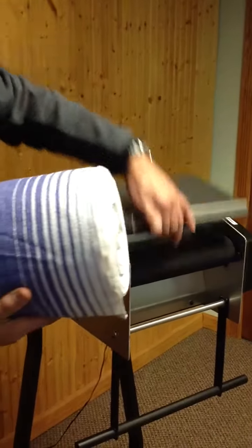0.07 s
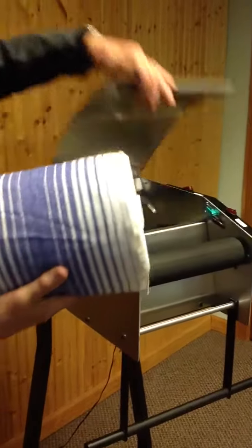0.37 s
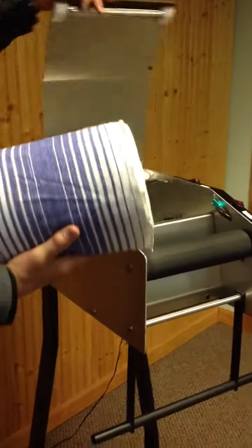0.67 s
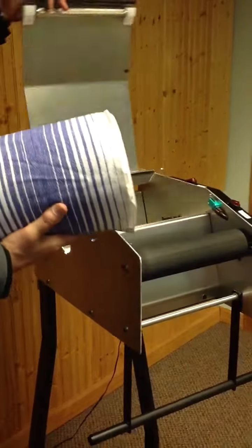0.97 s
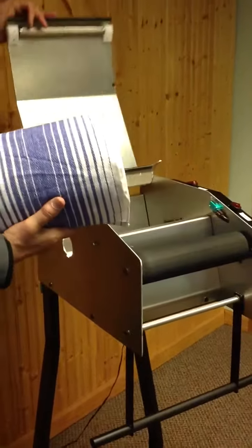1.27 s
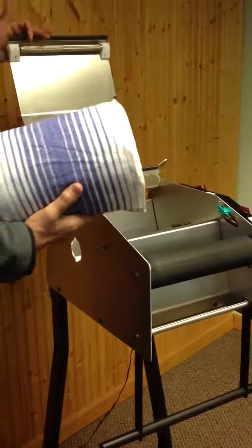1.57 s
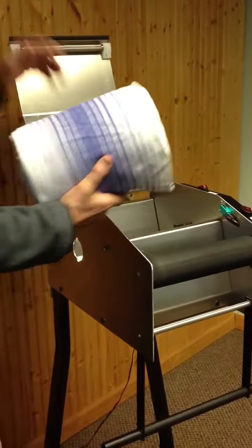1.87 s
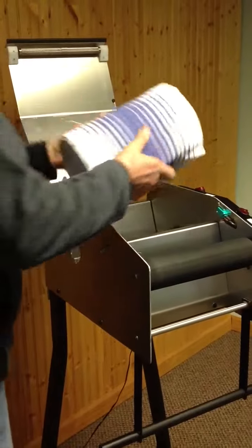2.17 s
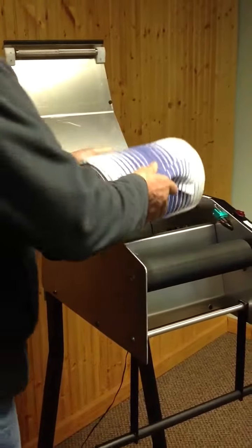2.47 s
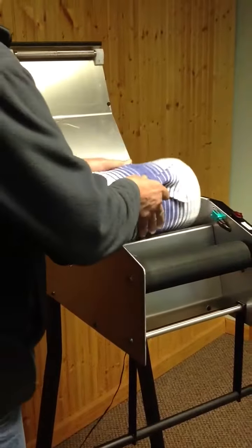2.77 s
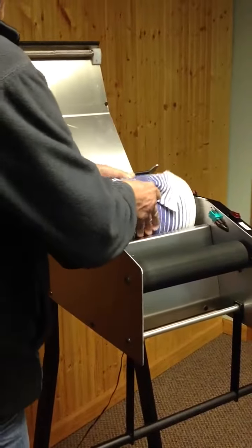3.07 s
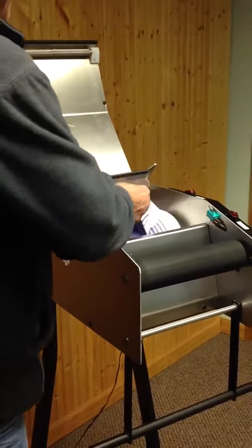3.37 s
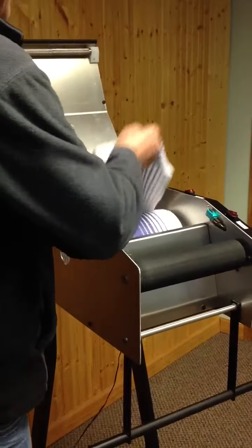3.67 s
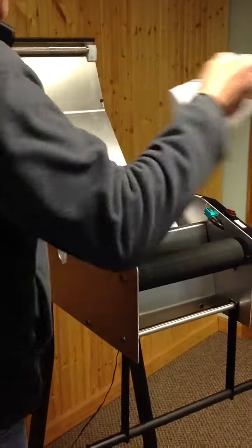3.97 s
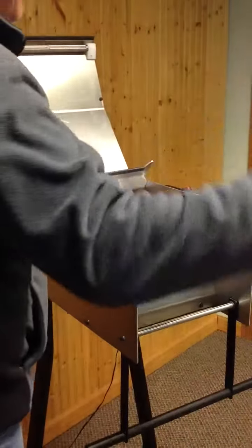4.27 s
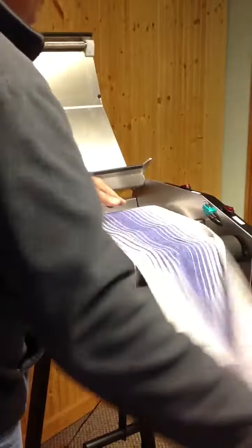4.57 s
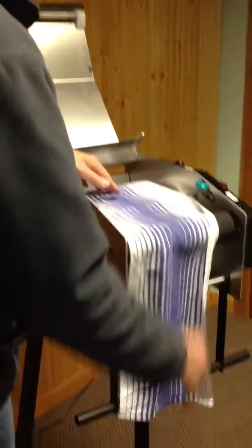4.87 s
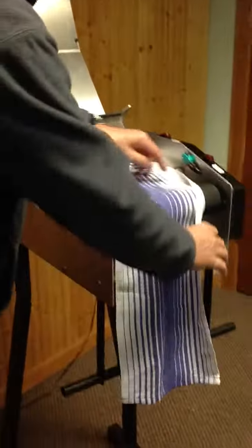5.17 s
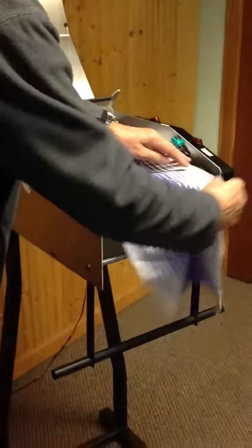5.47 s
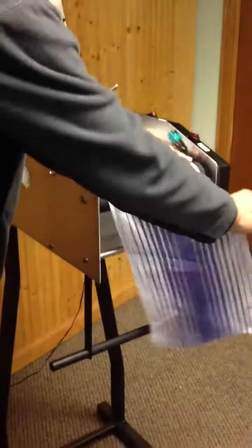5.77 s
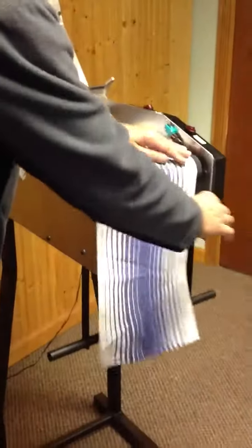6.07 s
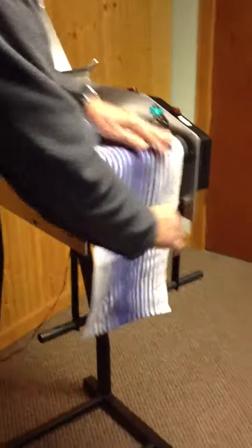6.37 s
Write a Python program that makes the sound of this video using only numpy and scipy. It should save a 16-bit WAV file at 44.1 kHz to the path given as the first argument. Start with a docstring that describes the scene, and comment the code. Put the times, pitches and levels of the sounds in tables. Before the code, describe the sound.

A low ventilation murmur runs throughout in a small, quiet room, with the microphone about a metre from a sheet-metal towel dispenser. A sleeve brushes faintly against a cloth roll, and the lid gives two small, sharp ticks at about 0.5 and 0.7 seconds. Near 1.5 seconds the lid knocks dully against its stop, followed by a brief, faint hinge creak at 1.7. At 2.3 seconds the roll drops into the steel bin with a bright clang, the loudest sound, leaving a light metallic ring. It settles with two softer clunks at about 2.9 and 3.4 seconds, amid cloth rustling. From 3.5 seconds the towel slides out with a soft swish, with a faint bump near 4.1. It flops onto the rollers around 4.7 seconds. Quiet swishes and light pats continue, with a pat at 6.2 and a faint bump near 6.4.

```python
"""In a small, quiet, wood-panelled room, a cloth towel roll is loaded into a sheet-metal dispenser.
The lid ticks open, knocks on its stop and creaks. The roll drops into the steel bin with a clang and
settles with two clunks, each impact exciting the damped modes of the metal. The towel is drawn out,
laid over the rollers and patted flat, rustling by friction. Ventilation murmurs underneath."""
import sys
import numpy as np
from scipy import signal
from scipy.fft import rfft, irfft, next_fast_len
from scipy.io import wavfile

SR = 44100
rng = np.random.default_rng(int(sys.argv[2]) if len(sys.argv) > 2 else 0)


def wav_record(signal):
    """Record a signal, one row per channel, as 16-bit PCM in the file named by sys.argv[1]."""
    frames = np.transpose(np.atleast_2d(signal))
    bounded = np.clip(frames, -1, 1)
    # unit amplitude maps onto the largest positive 16-bit level
    quanta = np.round(bounded * 32767).astype(np.int16)
    wavfile.write(sys.argv[1], SR, quanta)


N = 292383
T = np.arange(N) / SR


def steel_bin(panel_db=-10.0, rod_db=-2.5, clatter_db=-7, thud_t60_s=0.379):
    """Modal excitation: the spot where the roll strikes sets how strongly each mode of the bin rings."""
    # impacts of the roll: start_s, level_db, brightness_hz, spot (0 floor, 1 wall), thud_hz, thud_db
    blows = [(2.2791, -19.5, 8000, 0.27, 249.3, -21), (2.362, -51.5, 900, .7, 374, 3),
             (2.405, -38, 2800, 0.367, 550, -29), (2.929, -33, 2200, 1, 251.5, -11),
             (2.963, -41.5, 700, 1, 296.7, -10), (3.028, -49, 2800, 0.5, 279, -4.5),
             (3.357, -53, 450, 1, 476, 0), (3.4455, -37, 894, 1, 489.5, -9.5),
             (4.101, -63, 3030, .14, 300, -14.5), (4.734, -55, 802, 0.89, 237, -13.5),
             (6.43, -61, 1500, 0.54, 300, -16.5)]
    # modes of the sheet-steel panels: pitch_hz, floor_struck_db, wall_struck_db, t60_s
    panels = [(212, -13, -9, .33), (265, -11, -6, .35), (362, -17, -10, .5), (431, -8, -14, .25),
              (476, -13, -7, .25), (620, 1.5, -8, .22), (676, -1, -11, .19), (791, -15, -7, .17),
              (905, -9, -12, .16), (1026, -3, -11, .26), (1280, -10, -3, .18), (1453, -7, -5, .25),
              (1684, -3, -8, .25), (1736, 2, -10, .23), (1836, -3.5, -11, .24), (1948, 3, -12, .26),
              (2159, 3.5, -2, .26), (2392, -2, 0, .2), (2458, 7, 1, .2), (2581, -1, -1, .22),
              (2895, 0, -11, .3), (3212, -3, -17, .22), (3365, -3, -15, .1), (3530, -3, -12, .17),
              (3915, -1, -12, .15), (4592, -9, -13, .14), (5632, -10, -14, .22), (5782, -9, -14, .22),
              (6108, -8, -10, .19), (6327, -4, -9, .18)]
    # modes of the lightly damped steel rods: pitch_hz, level_db, t60_s
    rods = [(554, -24, 1.0), (691, -20, 1.5), (1093, -31, 3.1), (1183, -37, 2.6), (1297, -35, .9)]
    out, short, long = np.zeros(N), T[:SR * 3 // 4], T[:SR * 2]
    hz, floor_db, wall_db, t60_s = np.transpose(panels)
    for start_s, level_db, brightness_hz, spot, thud_hz, thud_db in blows:
        chatter_s = 0.00648 * (brightness_hz / 1000) ** 0.54  # harder contacts chatter for longer
        modes = np.column_stack([hz, floor_db + spot * (wall_db - floor_db), t60_s])
        # the cloth damps the spot it presses on, so the thud is a broad resonance
        thud = unit(band(rng.standard_normal(len(short)), 0.857 * thud_hz, 1.12 * thud_hz))
        thud *= undb(thud_db) * fade(short, thud_t60_s)
        # blows on the floor shake the rods; blows on the wall leave them alone
        body = undb(rod_db) * (1 - spot) * ring(rods, long, scatter_db=2.3)
        sheet = undb(panel_db) * ring(modes, short) + undb(clatter_db) * clatter(short)
        add(body, 0, sheet + thud)
        add(out, start_s, undb(level_db) * contact(body, long, brightness_hz, chatter_s))
    return out


def ring(modes, t, scatter_db=3.0):
    """Free vibration: a sum of damped sinusoids, weighted a little differently at every contact."""
    hz, level_db, t60_s = np.transpose(modes)[:, :, None]
    amplitude = undb(level_db + scatter_db * rng.standard_normal(hz.shape))
    phase = 2 * np.pi * (hz * t + rng.random(hz.shape))
    return np.sum(amplitude * fade(t, t60_s) * np.sin(phase), axis=0)


def clatter(t):
    """Modal overlap: modes too dense to tell apart merge into decaying half-octave bands of noise."""
    # weaker panel modes, blurred by the room: frequency_hz, relative_density_db, t60_s
    dense_modes = [(60, -24.5, .4), (142, -39.5, 0.2), (232, -9.5, 0.45), (330, -4.5, 0.85),
                   (700, -7, 0.615), (1170, -0.5, 0.321), (2300, -3, 0.368), (5000, -1, 0.187),
                   (6500, -16, 0.38), (8430, -17, 0.424), (12400, -27.5, 0.14), (15500, -45.5, .1)]
    hz, density_db, t60_s = np.transpose(dense_modes)
    edges_hz = np.geomspace(60, 16000, 17)
    out, power = 0, 0
    for low_hz, high_hz in zip(edges_hz, edges_hz[1:]):
        log_centre = np.log(low_hz * high_hz) / 2
        noise = band(rng.standard_normal(len(t)), low_hz, high_hz, order=3)
        noise *= undb(np.interp(log_centre, np.log(hz), density_db))
        out += noise * fade(t, np.interp(log_centre, np.log(hz), t60_s))
        power += noise.var()
    return out / np.sqrt(power)


def contact(x, t, brightness_hz, chatter_s, bass_hz=180):
    """Energy builds while a contact chatters; padding takes treble and thin sheet radiates little bass."""
    padding = signal.butter(1, brightness_hz, fs=SR, output="sos")
    radiation = signal.butter(3, bass_hz, "high", fs=SR, output="sos")
    energy = np.minimum(t / chatter_s, 1)
    return signal.sosfilt(np.vstack([padding, radiation]), x * np.sqrt(energy))


def lid(mode_db=-9.0, clatter_db=-6):
    """Plate vibration: the raised lid bumps its stop and rings in its own modes."""
    # knocks on the stop: start_s, level_db, brightness_hz, chatter_s
    knocks = [(1.439, -48, 2200, 0.0124), (1.458, -37, 474, 0.00134), (1.49, -51.5, 930, 0.0024)]
    # modes of the lid: pitch_hz, level_db, t60_s
    modes = [(235.5, 0.5, 0.138), (309, -5.5, 0.814), (413, -3, 0.069), (497.4, 7.5, 0.047),
             (619.5, 9, 0.038), (899, -9, 0.183), (1057, -1, 0.37)]
    out, t = np.zeros(N), T[:SR]
    for start_s, level_db, brightness_hz, chatter_s in knocks:
        sheet = undb(mode_db) * ring(modes, t) + undb(clatter_db) * clatter(t)
        add(out, start_s, undb(level_db) * contact(sheet, t, brightness_hz, chatter_s))
    return out


def hinge(start_s=1.68, rise_s=0.0018, rasp=0.88):
    """Stick-slip friction: the dry pin creaks once as the hand lets go, roughening the hinge's tones."""
    # modes of the hinge: pitch_hz, level_db, t60_s
    modes = [(1945, -61, .13), (2040, -63, .09), (2480, -68, .08), (3850, -62, .08), (4650, -66, .08)]
    out, t = np.zeros(N), T[:SR]
    grip = unit(1 + rasp * walk(273)[:SR])
    onset = 1 - np.exp(-t / rise_s)
    add(out, start_s, grip * ring(modes, t) * onset)
    return out


def ticks(room_t60_s=0.297, room_fill_s=0.046):
    """Impact and reverberation: brief cracks of metal on metal each leave a duller tail in the room."""
    # small hard contacts: start_s, level_db, centre_hz, width_hz, t60_s
    contacts = [(.474, -49, 5320, 5080, 0.0114), (.6738, -33.5, 12050, 4000, 0.0059),
                (1.694, -60, 5780, 3200, 0.038), (2.0845, -54.5, 6000, 5000, .01),
                (2.280, -28.5, 7590, 6000, 0.073), (2.291, -31, 5320, 2650, 0.0436),
                (2.8835, -44, 2170, 3500, 0.0034), (2.928, -36, 6880, 2180, 0.078),
                (2.9345, -39, 6940, 2400, 0.0385), (2.931, -52, 11400, 4880, .025),
                (3.4077, -50.5, 6030, 4000, 0.006), (3.4457, -56, 4080, 3500, 0.074)]
    # the room's response, absorbing the highest treble: frequency_hz, gain_db
    room = [(2000, -3), (4500, -4.5), (7000, -6), (9000, -12), (12000, -20.5)]
    out, t = np.zeros(N), T[:SR // 2]
    for start_s, level_db, centre_hz, width_hz, t60_s in contacts:
        low_hz = np.hypot(centre_hz, width_hz / 2) - width_hz / 2  # the centre is a geometric mean
        crack = unit(band(rng.standard_normal(len(t)), low_hz, low_hz + width_hz))
        # a longer contact feeds the room more energy
        tail = colour(crack, room) * np.sqrt(t60_s / room_fill_s) * fade(t, room_t60_s)
        add(out, start_s, undb(level_db) * (crack * fade(t, t60_s) + tail))
    return out


def towel(slide_db=1.0, held_db=-70, pat_rise_s=0.0097):
    """Friction noise: the towel rustles faintly when held, swells as it slides and puffs when patted."""
    # slides through the hands: start_s, length_s, relative_peak_db
    slides = [(0, 1.76, -66.5), (1.64, 0.27, -66.5), (1.95, 0.344, -60), (2.2, 0.332, -60.5),
              (2.5, 0.254, -58), (2.7, 0.408, -59), (3.14, 0.193, -55.5), (3.3, 0.098, -58),
              (3.3, 0.366, -63.5), (3.5, 1.011, -61.5), (4.85, 1.07, -68.5), (5.43, 0.097, -65),
              (5.62, 0.197, -59.5), (6.03, 0.096, -66), (6.18, 0.544, -66.5)]
    # pats and flops on the rollers: start_s, level_db, t60_s
    pats = [(4.735, -58.5, 0.166), (5.124, -69.5, 0.245), (6.232, -59.5, 0.268)]
    # spectrum of the rustle: frequency_hz, relative_density_db
    spectrum = [(50, -40.5), (400, -0.5), (1000, -2.5), (2000, -7), (4200, -4), (5800, 2), (7500, 2.5),
                (10000, 1), (12500, 4), (14000, 0), (15500, -11.5)]
    envelope = undb(slide_db) * np.hypot(friction(slides), undb(held_db))
    for start_s, level_db, t60_s in pats:
        add(envelope, start_s, undb(level_db) * fade(T, t60_s) * (1 - fade(T, pat_rise_s)))
    return envelope * fibres(spectrum)


def sleeve():
    """Friction noise: a sleeve brushes the roll while the lid is lifted."""
    # brushes against the roll: start_s, length_s, peak_db
    brushes = [(-.2, 1, -63), (.5, 0.934, -68.5), (1.12, 0.452, -66.5)]
    # spectrum of the brushing: frequency_hz, relative_density_db
    spectrum = [(80, -44.5), (500, -8.5), (2950, -13.5), (3330, -5.5), (3700, -13), (5000, -4),
                (5700, -2.5), (6500, -6), (7500, -5.5), (12000, -16)]
    return friction(brushes) * fibres(spectrum)


def friction(strokes, speed_exponent=0.597, skew=1.176):
    """Incoherent addition: each stroke's amplitude follows the hand's speed, and their powers add."""
    power = 0
    for start_s, length_s, peak_db in strokes:
        progress = np.clip((T - start_s) / length_s, 0, 1)
        speed = np.abs(np.sin(np.pi * progress ** skew))  # gathers more slowly than it stops
        power += (undb(peak_db) * speed ** speed_exponent) ** 2
    return np.sqrt(power)


def fibres(spectrum, grain_db=2.0, flutter_db=1.5):
    """Stick-slip noise: countless threads catch and let go, a few of them harder than the rest."""
    slips = rng.standard_normal(N) * undb(grain_db * np.minimum(rng.exponential(size=N), 8))
    return unit(colour(slips, spectrum)) * undb(flutter_db * walk(35))


def ventilation(air_db=-61.5, swell_db=-1.01, waver_db=-0.5, drift_hz=1.24):
    """Broadband and tonal fan noise: a low rush of moving air carries two wavering tones."""
    # spectrum of the airflow: frequency_hz, relative_density_db
    spectrum = [(25, -37.5), (50, -31.5), (80, -17), (115, -13.5), (145, 1), (185, -3), (245, 5),
                (340, -5.5), (600, -9.5), (900, -13.5), (1600, -20.5), (4000, -23.5), (9000, -23.5),
                (15000, -24.5)]
    # fan tones: pitch_hz, rms_db
    tones = [(237.5, -71.5), (599, -71.5)]
    air = unit(colour(rng.standard_normal(N), spectrum)) * undb(air_db + swell_db * walk(3.2))
    for pitch_hz, rms_db in tones:
        phase = 2 * np.pi * np.cumsum(pitch_hz + drift_hz * walk(12)) / SR
        air += np.sqrt(2) * undb(rms_db + waver_db * walk(7)) * np.sin(phase)
    return air


def undb(db):
    """Decibels to amplitude ratio."""
    return 10 ** (np.asarray(db) / 20)


def unit(x):
    """Normalisation to an rms of 1."""
    return x / np.sqrt(np.mean(x ** 2))


def fade(t, t60_s):
    """Exponential decay, 60 dB down after t60_s."""
    return np.exp(-np.log(1000) * t / t60_s)


def add(out, start_s, x):
    """Superposition of x onto out from start_s."""
    i = int(start_s * SR)
    out[i:i + len(x)] += x[:N - i]


def colour(x, points):
    """Spectral shaping by (frequency_hz, gain_db) points joined on a log-frequency axis."""
    hz, gain_db = np.transpose(points)
    size = next_fast_len(len(x))
    bins_hz = np.maximum(np.arange(size // 2 + 1) * SR / size, 1)
    gain = undb(np.interp(np.log(bins_hz), np.log(hz), gain_db))
    return irfft(rfft(x, size) * gain, size)[:len(x)]


def band(x, low_hz, high_hz, order=2):
    """Causal band-pass filtering."""
    edges_hz = [low_hz, min(high_hz, SR / 2 - 1)]
    return signal.sosfilt(signal.butter(order, edges_hz, "band", fs=SR, output="sos"), x)


def walk(rate_hz):
    """Random modulation: a continuous wander with a spread near 1."""
    steps = rng.standard_normal(N // 100)
    return np.interp(T * rate_hz, np.arange(len(steps)), steps)


def scene():
    """Superposition: all sources add at one point, about a metre from the dispenser."""
    return (steel_bin() + lid() + hinge() + ticks() + towel() + sleeve() + ventilation())[None]


def record(dry, top_hz=15400):
    """Resonance of the microphone port lifts a band of treble; a steep low-pass cuts the top."""
    # response of the port: frequency_hz, gain_db
    port = [(4200, 2), (5100, .5), (5600, 5), (6300, 4), (7100, -1.5)]
    heard = np.array([colour(x, port) for x in dry])
    return signal.sosfilt(signal.ellip(10, .2, 70, top_hz, fs=SR, output="sos"), heard)


dry = scene()
out = record(dry)
wav_record(out)
```